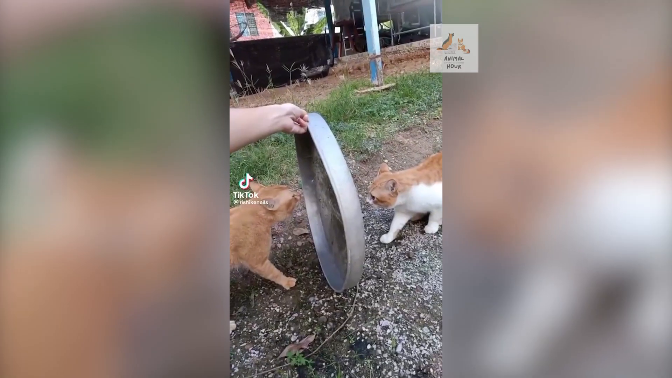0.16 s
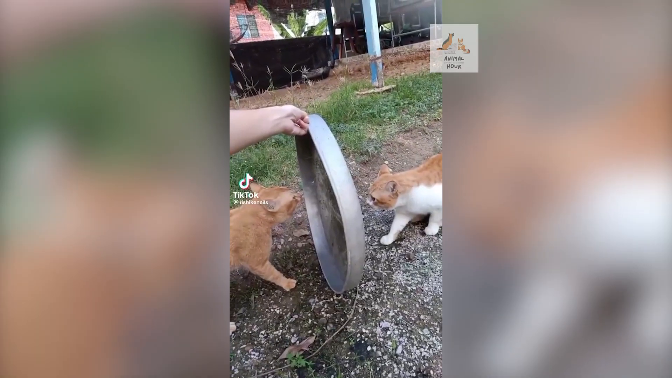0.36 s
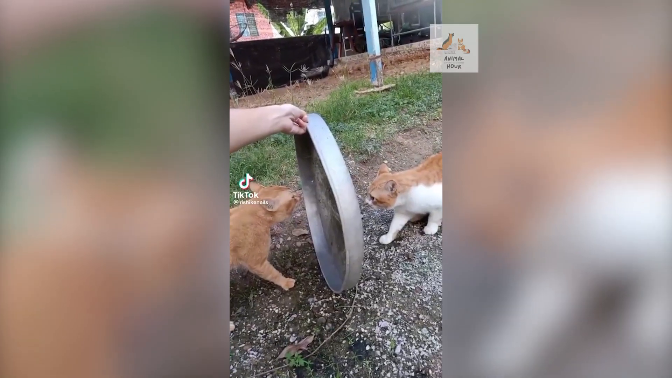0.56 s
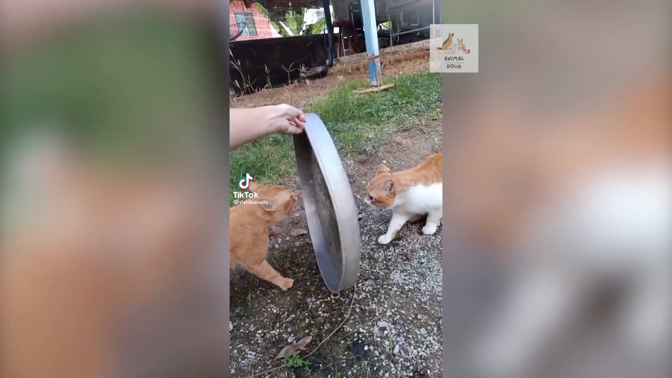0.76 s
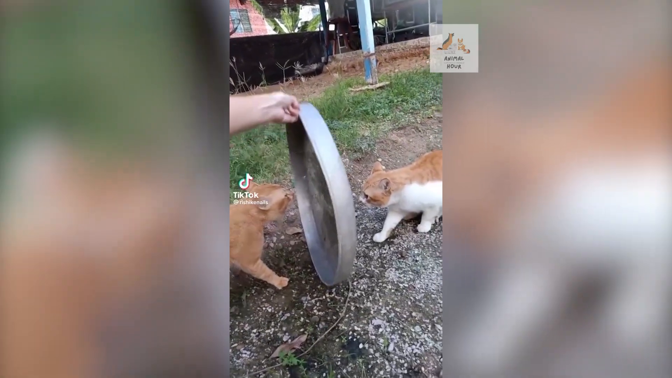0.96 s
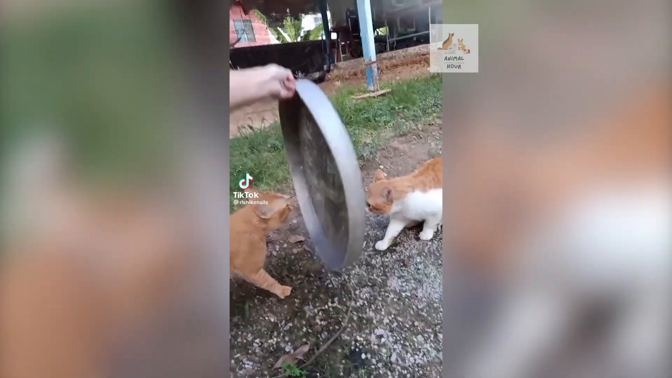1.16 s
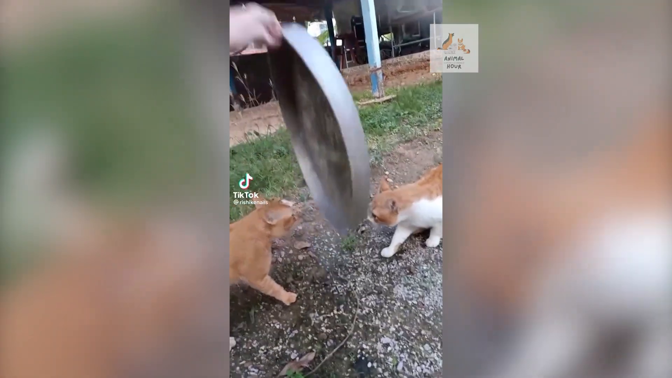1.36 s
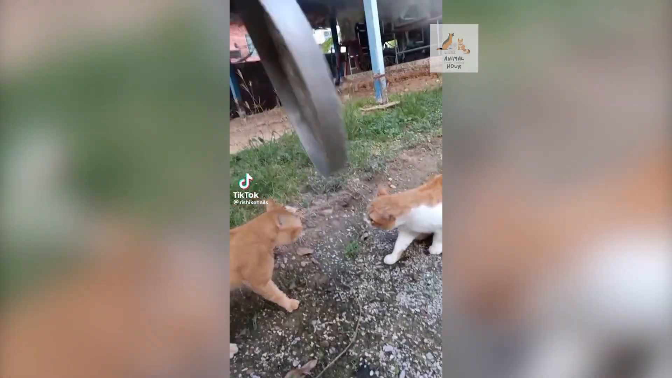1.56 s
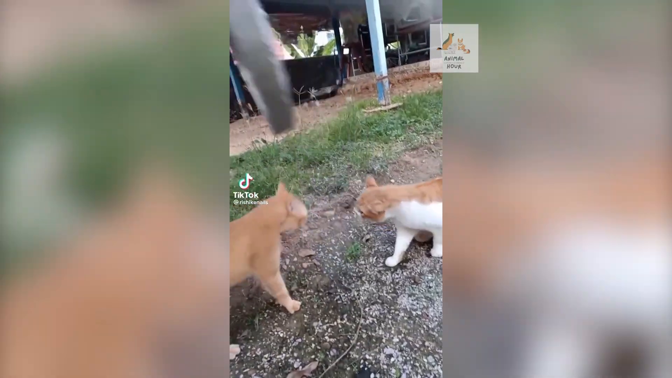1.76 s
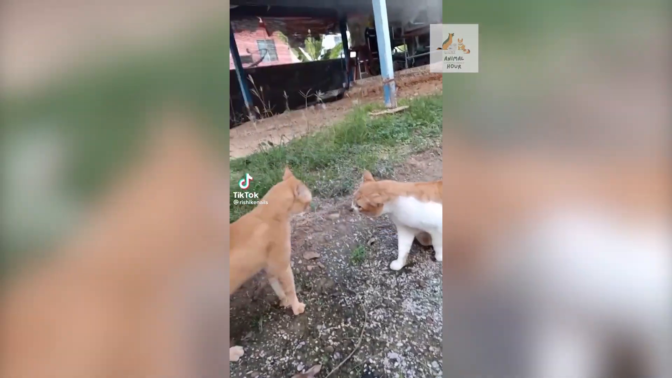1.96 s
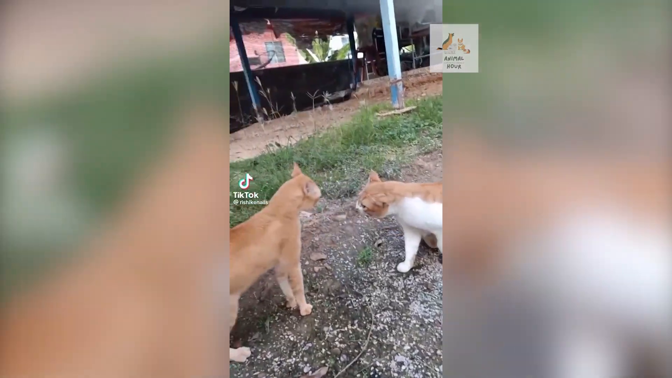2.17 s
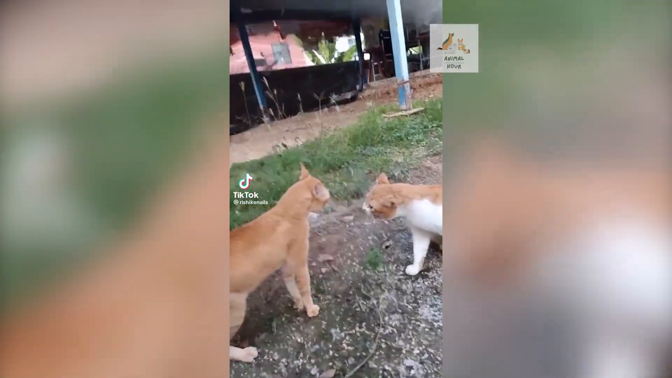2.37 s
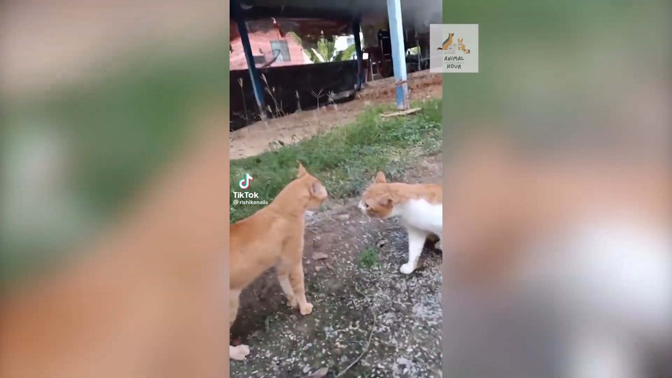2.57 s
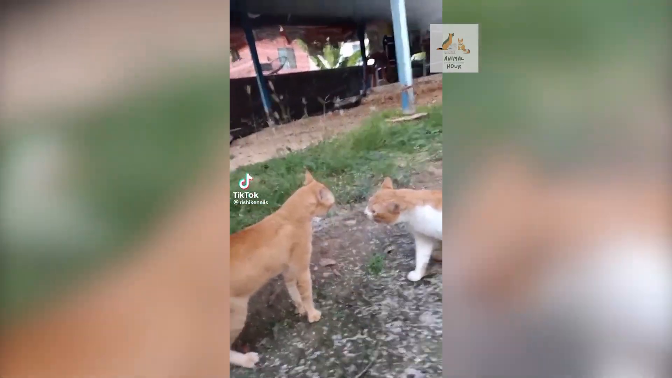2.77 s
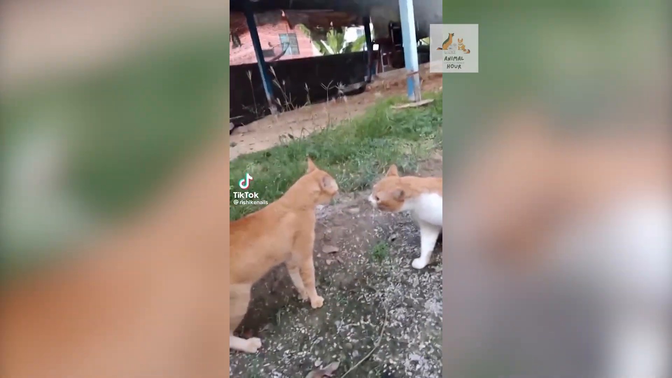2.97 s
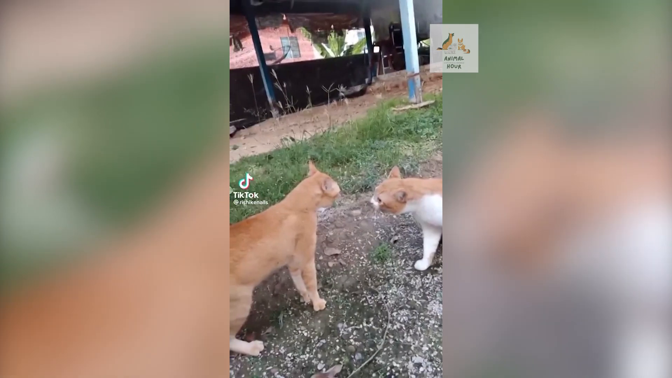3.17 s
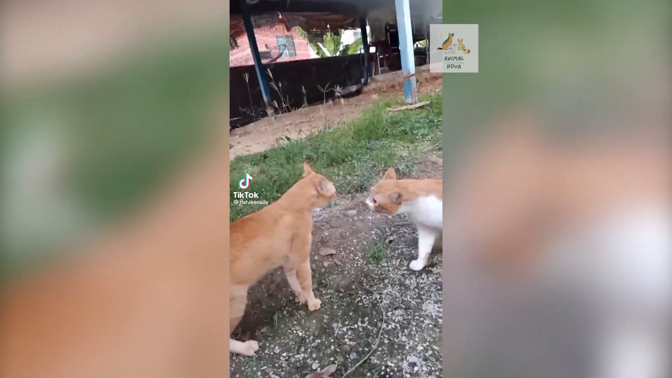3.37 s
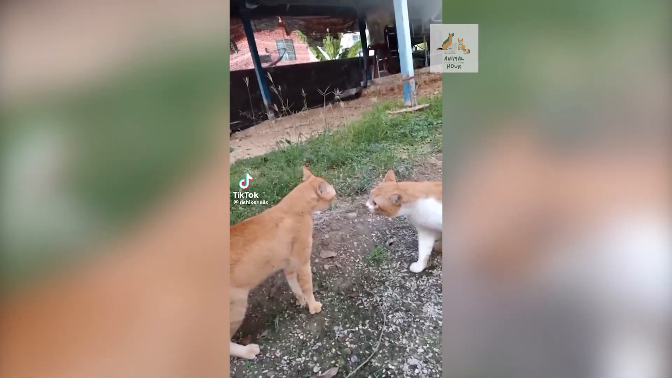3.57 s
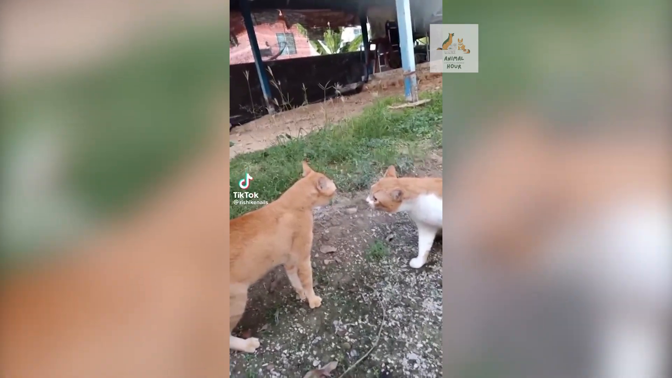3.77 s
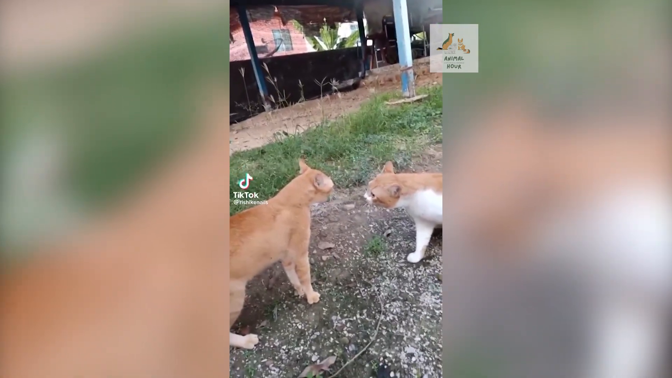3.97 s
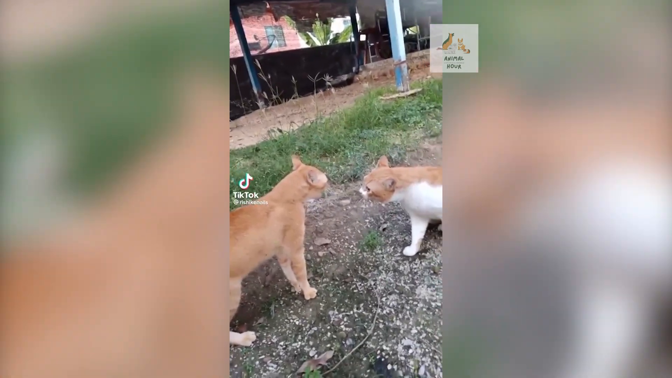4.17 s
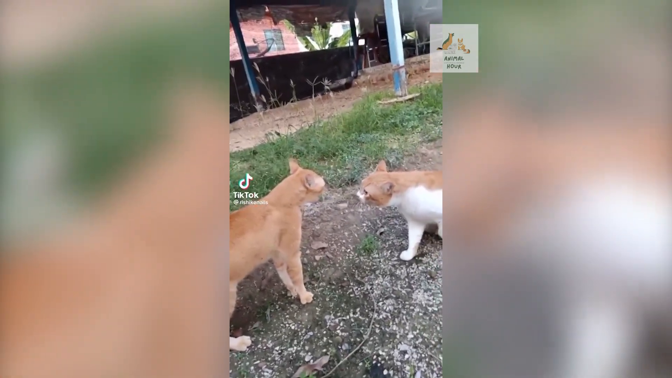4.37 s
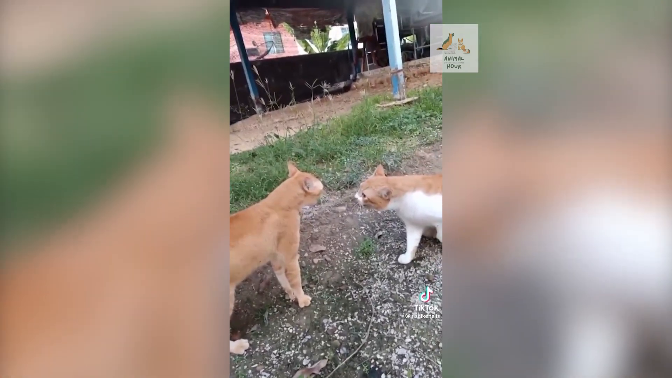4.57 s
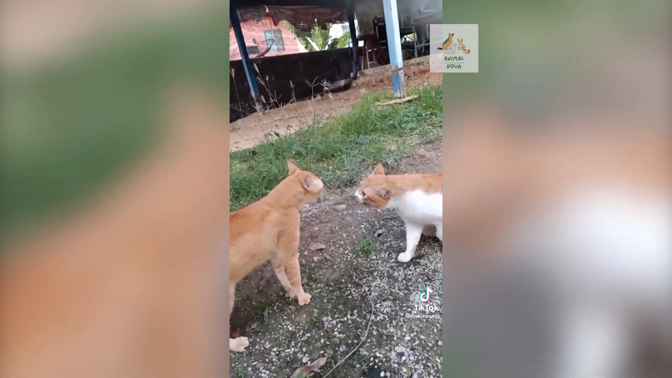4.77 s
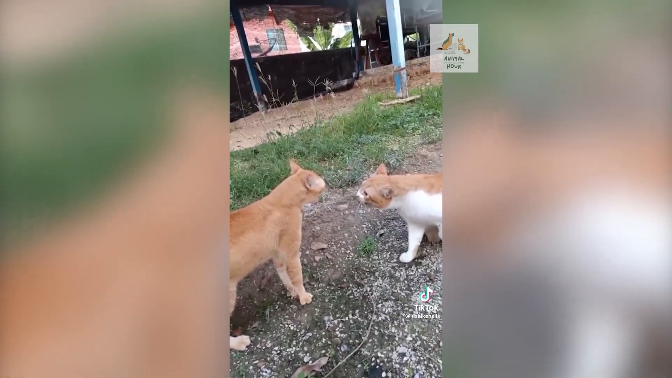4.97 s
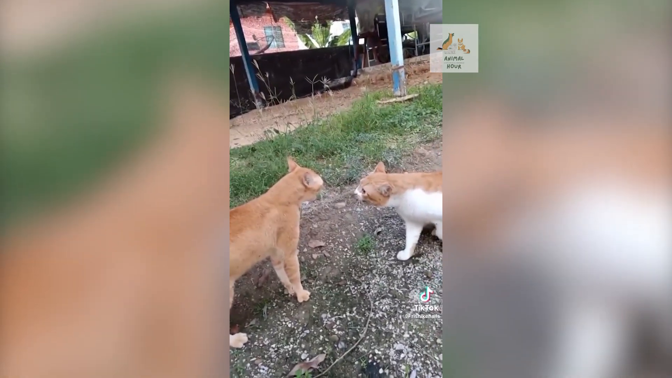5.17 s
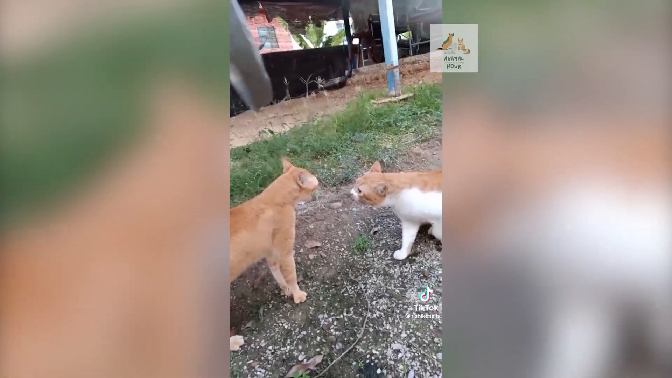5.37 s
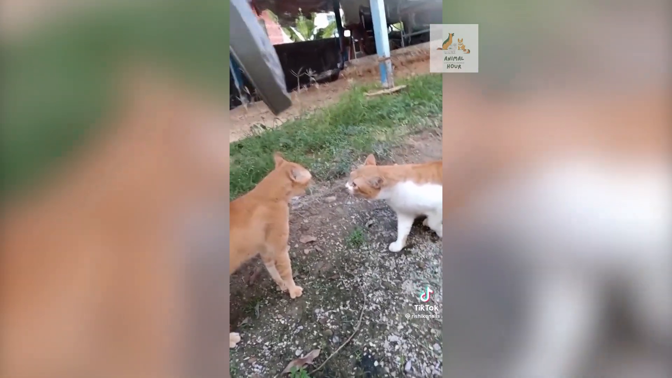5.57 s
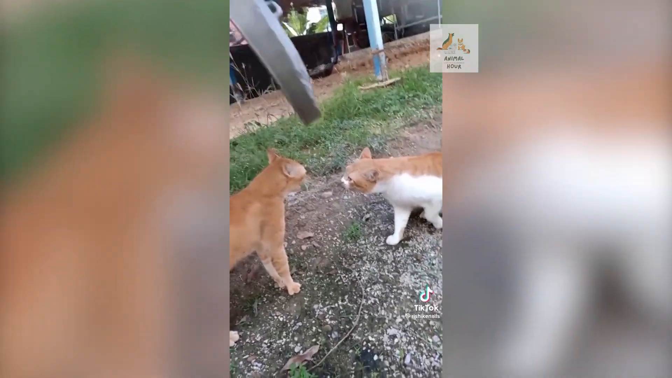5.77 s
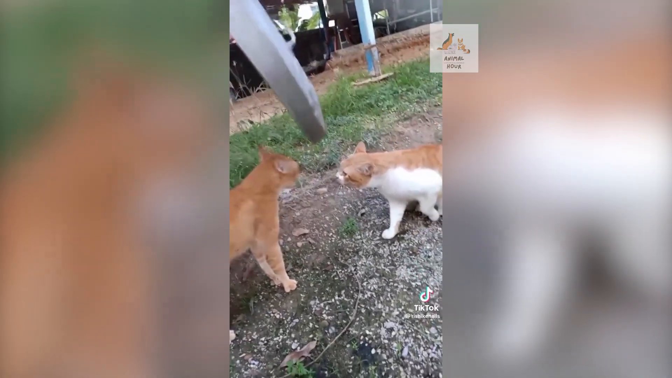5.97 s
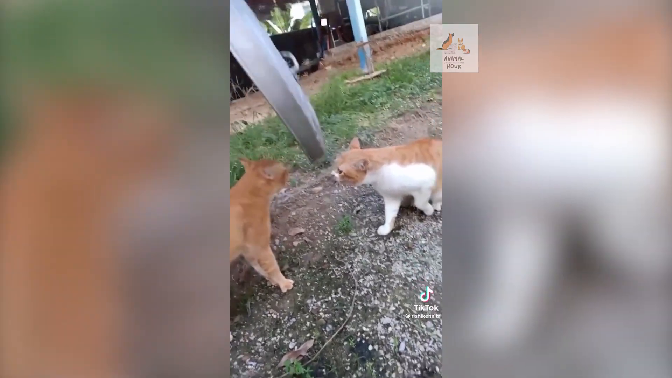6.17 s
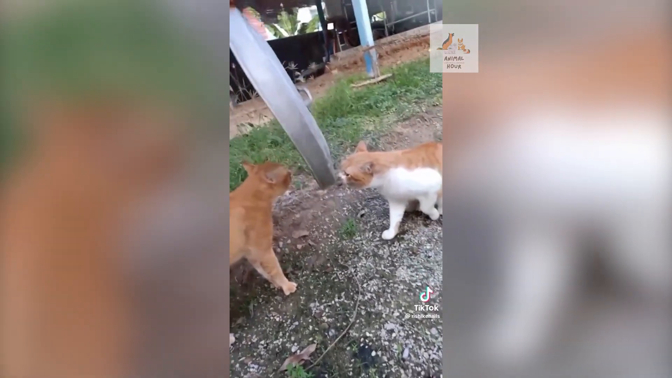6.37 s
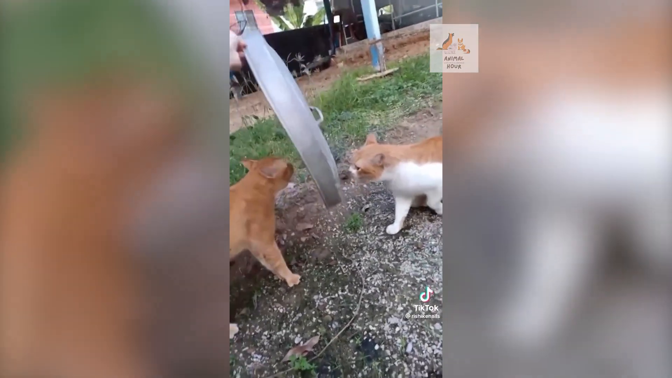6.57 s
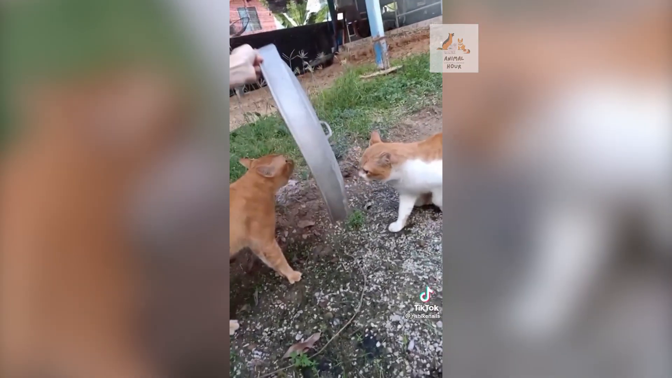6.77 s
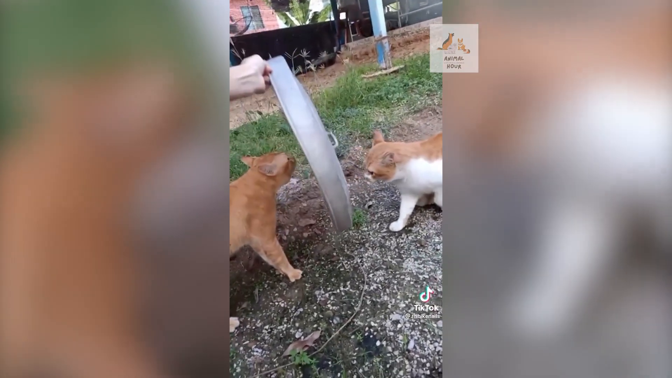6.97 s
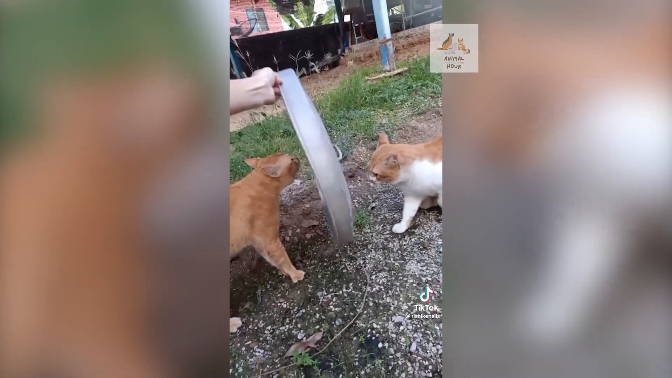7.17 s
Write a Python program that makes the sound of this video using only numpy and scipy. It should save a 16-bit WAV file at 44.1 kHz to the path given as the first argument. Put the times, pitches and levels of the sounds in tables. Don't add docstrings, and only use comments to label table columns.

```python
import sys
import numpy as np
from scipy import signal
from scipy.io import wavfile
from scipy.ndimage import uniform_filter1d

SR = 44100
rng = np.random.default_rng(int(sys.argv[2]) if len(sys.argv) > 2 else 0)


def invert_db(level):
    return 10 ** (np.asarray(level, dtype=float) / 20)


def inscribe(sig):
    pcm = np.round(np.clip(np.atleast_2d(sig).T, -1, 1) * 32767)
    wavfile.write(sys.argv[1], SR, pcm.astype(np.int16))


N = 318843
STEP = 64


def rms_one(x):
    return x / np.sqrt(np.mean(x ** 2, axis=-1, keepdims=True) + 1e-20)


def columns(rows, t):
    s, *values = np.transpose(rows)
    return [np.interp(t, s, v) for v in values]


def band(x, low_hz, high_hz, rate=SR):
    sos = signal.butter(2, [low_hz, high_hz], "band", fs=rate, output="sos")
    return rms_one(signal.sosfilt(sos, x))


def high_pass(x, order, hz):
    return signal.sosfilt(signal.butter(order, hz, "high", fs=SR, output="sos"), x)


def resonance(f, hz, width):
    return (f * width) ** 2 / ((hz ** 2 - f ** 2) ** 2 + (f * width) ** 2)


def shape(phrases, throat, side, rest_hz, lift):
    start, end = phrases[0][0], phrases[-1][0]
    t = np.append(np.arange(start, end, .005), end)
    hz, db, mouth_hz, tongue_db = columns(phrases, t)
    chest_db, throat_hz, throat_db = columns(throat, t)
    gap_hz, depth, palate_hz, palate_db = columns(side, t)
    palate_db = palate_db - np.clip(abs(np.gradient(palate_hz, t)) / 900 - 16, 0, 35)
    slack, slack_s = 0.17, 0.17
    tense = 1 - slack * np.exp(-np.minimum(t - t[0], t[-1] - t) / slack_s)
    knee = 0.67
    tongue_hz = rest_hz * tense + lift * np.maximum(0, mouth_hz - knee * rest_hz)
    mouth = np.c_[t, chest_db, gap_hz, np.clip(depth, 0, .97), mouth_hz, db, tongue_hz, db + tongue_db,
                  throat_hz, db + throat_db, palate_hz, db + palate_db]
    return np.c_[t, hz], mouth


def swallowed(f, gap_hz, depth, mouth_hz, tongue_hz, nose):
    valley = np.clip((tongue_hz - mouth_hz - 800) / 900, 0, .45)
    left = 1 - depth * resonance(f, gap_hz, 1300)
    left = left * (1 - valley * resonance(f, np.sqrt(mouth_hz * tongue_hz), 590))
    left = left * (1 - nose * resonance(f, 745, 180.0))
    left = left * (1 - 0.5 * resonance(f, 6700, 880))
    return left * (1 - 1.2 * resonance(f, 9000, 1100))


def unsteady(f, k, mouth_hz, flap, flutter, breath, shimmer_db):
    slowly, hiss = rng.standard_normal((2, len(f)))
    depth_db = shimmer_db * min(k, 12) + 2.8 * np.clip(f / 5500 - 1, 0, 1)
    wobble = invert_db(depth_db * band(slowly, 1.2, 10.0, rate=SR / STEP))
    wobble = wobble * invert_db(2.5 * np.minimum(f / 5000, 1.5) * band(hiss, 14, 55, rate=SR / STEP))
    wobble = wobble + (breath + 1.1 * flutter) * np.minimum(f / 3500, 1.4) ** 2 * hiss
    wobble = wobble * (1 + .75 * flap * resonance(f, mouth_hz, 900))
    return wobble * (1 + .4 * np.roll(flap, k))


def call(pitch, mouth, widths, chest_slope, beat, flutter, jitter, shimmer_db, breath, leak_db, nose):
    at = np.arange(round(pitch[0][0] * SR), min(N, round(pitch[-1][0] * SR)))
    t = at / SR
    beat, flutter = beat[at], flutter[at]
    hz = uniform_filter1d(columns(pitch, t)[0], size=600)
    hz = hz * (1 + jitter * band(rng.standard_normal(len(t)), 1.4, 60))
    phase = 2 * np.pi * np.cumsum(hz) / SR

    fast, slow = rng.standard_normal((2, len(t)))
    turn = 2 * np.pi * np.cumsum(245 + 40 * band(fast, 10, 80)) / SR
    flap = (np.cos(turn) + .65 * np.cos(turn / 2) + .45 * band(slow, 60, 450)) * flutter
    swell = 1 + 2 * beat * np.cos(phase / 3)
    slip = .2 * beat * np.sin(phase / 3)
    phase = phase + .14 * np.roll(flap, 44) + .05 * flutter * band(fast, 60, 300) + slip

    coarse = t[::STEP]
    coarse_hz = hz[::STEP]
    (chest_db, gap_hz, depth, mouth_hz, mouth_db, tongue_hz, tongue_db,
     throat_hz, throat_db, palate_hz, palate_db) = columns(mouth, coarse)
    resonances = [(mouth_hz, mouth_db), (tongue_hz, tongue_db), (throat_hz, throat_db),
                  (palate_hz, palate_db)]
    glide = uniform_filter1d(abs(np.gradient(np.log(coarse_hz), coarse)), size=30)
    breath = breath + 0.02 * np.minimum(glide, 3)

    out = np.zeros(len(t))
    for k in range(1, int(9000 / hz.min())):
        f = k * coarse_hz
        chest = invert_db(chest_db) / k ** chest_slope
        leak = invert_db(mouth_db + leak_db)
        power = chest ** 2 + leak ** 2
        for (centre, db), width in zip(resonances, widths):
            power = power + (invert_db(db) * resonance(f, centre, width)) ** 2
        power = power * swallowed(f, gap_hz, depth, mouth_hz, tongue_hz, nose) ** 2
        wobble = unsteady(f, k, mouth_hz, flap[::STEP], flutter[::STEP], breath, shimmer_db)
        dull = 1 / (1 + (f / 6800) ** 3.5)
        size = np.sqrt(power) * wobble * dull * (f < 15000)
        out += np.interp(t, coarse, size) * np.cos(k * phase + k * k * .4)

    torn_air = band(band(slow, 3300, 6400), 3300, 6400)
    out = out + invert_db(-17) * flutter * uniform_filter1d(abs(out), size=90) * torn_air
    fade = np.clip(np.minimum(t - t[0], t[-1] - t) / .012, 0, 1)
    full = np.zeros(N)
    full[at] = out * swell * fade
    return full


# ([Hz], [Hz], [Hz], [Hz])
RESONANCE_WIDTHS = [
    [398, 455, 760, 360],
    [230, 180, 220, 500],
]
# (time [s], pitch [Hz], level [dB], mouth resonance [Hz], tongue against mouth [dB])
FAR_HUM = [(0, 196, -52, 394, -29), (.17, 201, -49, 406, -32), (0.361, 195, -50.5, 404, -24),
           (.61, 183.8, -54.5, 366, -40), (.7, 177, -58, 346, -24), (.76, 158.6, -70, 351, -24)]
FAR_MEW = [(.71, 204.6, -50, 535, -36), (0.752, 207.6, -54, 352, -9), (0.801, 249, -58.5, 480, -2),
           (0.829, 284.4, -52.5, 470, -4.5), (0.94, 326, -47.5, 720, -10), (1.07, 339.4, -46, 793, -9),
           (1.238, 324.4, -49.5, 723, -15), (1.429, 298.8, -50, 548, -44), (1.558, 257, -49, 466, -36),
           (1.591, 243.4, -50, 567, -35)]
FAR_ANSWER = [(1.699, 254, -58, 519, -30.5), (1.788, 297, -59.5, 1220, -32), (1.889, 394, -45, 1315, -37.5),
              (2.081, 465.5, -36.5, 1396, -54), (2.17, 553.5, -22, 1430, -54), (2.3, 599.5, -21, 1566, -44),
              (2.375, 600.7, -21, 1574, -44.5), (2.466, 556.4, -23.5, 1339, -32.5),
              (2.498, 445.5, -27, 1419, -18), (2.529, 421.8, -34.5, 1324, -42)]
FAR_SINK = [(2.699, 359, -47.5, 1116, -16), (2.78, 338.6, -43.5, 870, -30), (2.849, 295, -55.5, 880, 2.5),
            (2.909, 287.5, -60, 910, -21), (2.962, 260.8, -59, 940, -20), (3.111, 231.6, -54.5, 970, -14.5),
            (3.161, 190, -73, 900, -25)]
FAR_CRY = [(4.084, 202, -65, 300, -16), (4.125, 225.3, -64, 557, -16), (4.186, 315.3, -54.5, 817, -5.5),
           (4.265, 366, -45, 1190, -16), (4.345, 378.7, -36.5, 1240, -7), (4.644, 370.3, -40, 1173, -10.5),
           (4.776, 383.7, -34, 1183, -11), (4.875, 366.4, -30, 1217, -23),
           (4.974, 328.5, -40.5, 1068, -10.5)]
FAR_GROAN = [(5.052, 316, -42.5, 1006, -21.5), (5.137, 303, -44.5, 870, -33.5), (5.207, 265, -50, 740, -23),
             (5.39, 222, -64.5, 398, -7.5), (5.485, 212.1, -55.5, 406, -20.5),
             (5.696, 215.6, -56, 384.8, -26), (5.936, 214, -56.5, 364, -5), (6.166, 201, -53.5, 360, -5),
             (6.218, 181, -72, 364, -22)]
# (time [s], chest level [dB], throat resonance [Hz], throat against mouth [dB])
FAR_POSTURE = [(0, -53.5, 5600, -32.5), (.74, -54.5, 5500, -29.5), (.765, -67, 3900, -26),
               (.86, -62, 3960, -21), (.92, -59, 4080, -15.5), (1.3, -57, 3780, -24.5),
               (1.55, -61.5, 3739, -39.5), (2.4, -63, 3693, -58), (3.16, -68.5, 3837, -36.5),
               (4.09, -72, 4310, -28.5), (4.2, -65.5, 4300, -19.5), (4.3, -62, 4700, -32),
               (4.55, -61, 4500, -33.5), (5.4, -61.5, 6800, -34.5), (6.22, -64.5, 6800, -37)]
# (time [s], swallowed band [Hz], depth [0-1], palate resonance [Hz], palate against mouth [dB])
FAR_CAVITIES = [(0, 1140, 0.91, 2110, -28), (.7, 1150, 0.35, 2010, -26), (.85, 2000, 0.19, 2430, -31),
                (1.1, 2000, 0.17, 2600, -34), (1.55, 2000, .4, 2207, -25), (2.2, 3400, 0.41, 2322, -2.5),
                (2.35, 3400, .4, 2540, -2), (2.5, 3400, 0.36, 2330, -19.5), (4.09, 3202, .4, 5700, -37.5),
                (4.23, 3200, 0.33, 5580, -22), (4.29, 3280, 0.37, 6170, -25), (4.33, 3280, 0.28, 6960, -34),
                (4.6, 3310, 0.49, 7060, -38), (5.4, 2010, 0.27, 7100, -46), (6.22, 2006, 0.65, 7030, -43.5)]
# (time [s], level [dB])
NOSE_AIR = [(0, -88), (.7, -80), (1.05, -72.5), (1.5, -83), (1.6, -71), (2.6, -85.5), (4.0, -90),
            (7.23, -100)]


def far_cat():
    breaths = [FAR_HUM, FAR_MEW + FAR_ANSWER + FAR_SINK, FAR_CRY + FAR_GROAN]
    tongue_rest_hz = [2120, 1320, 1900]
    tongue_lift = [1.6, 0.79, 1.5]
    no_beat, calm = np.zeros(N), np.full(N, .015)
    moans = 0
    for phrases, rest_hz, lift in zip(breaths, tongue_rest_hz, tongue_lift):
        pitch, mouth = shape(phrases, FAR_POSTURE, FAR_CAVITIES, rest_hz, lift)
        moans = moans + call(pitch, mouth, RESONANCE_WIDTHS[1], 3.0, no_beat, calm, jitter=0.0054,
                             shimmer_db=0.205, breath=0.08, leak_db=-52, nose=0.1)
    low, high = rng.standard_normal((2, N))
    hiss = band(low, 1500, 3000) + .45 * band(high, 3800, 6300)
    return moans + invert_db(columns(NOSE_AIR, np.arange(N) / SR)[0]) * hiss


# (delay [s], level [dB])
CLOSE_ECHOES = [
    (.0011, -9),
    (.0027, -11),
]


def mirrored(x):
    top = high_pass(x, 2, 3000)
    return x + sum(invert_db(db) * np.roll(top, round(s * SR)) for s, db in CLOSE_ECHOES)


def yard(x):
    t60_s, level_db = 0.31, -20
    t = np.arange(SR // 2) / SR
    white = rng.standard_normal(len(t))
    tail = band(white, 360, 4500) + 1.1 * band(white, 4200, 6600)
    tail = tail * invert_db(-60 * t / t60_s) * (t > .012)
    return invert_db(level_db) * signal.fftconvolve(x, tail / np.sqrt(np.sum(tail ** 2)))[:N]


# (frequency [Hz], density [dB per Hz])
AIR_COLOUR = [(25, -24.5), (110, -7), (280, -13), (420, -11.5), (700, -18), (1200, -19), (2500, -41.5),
              (5000, -41), (15000, -57)]
# (time [s], level [dB])
AIR_GAIN = [(0, -73), (1.7, -63.5), (2.5, -76.5), (4.0, -74.5), (5.0, -72), (7.23, -69)]


def air():
    edges = 25 * 2 ** np.arange(0, 9.6, .5)
    white = rng.standard_normal((2, N))
    hz, db = np.transpose(AIR_COLOUR)
    out = 0
    for k, (low, high) in enumerate(zip(edges, edges[1:])):
        slow = band(rng.standard_normal(N // STEP + 1), 0.79, 5.9, rate=SR / STEP)
        level_db = np.interp(np.log(low * high) / 2, np.log(hz), db)
        level_db = level_db + 2.0 * np.repeat(slow, STEP)[:N]
        out = out + invert_db(level_db) * np.sqrt(high - low) * band(white[k % 2], low, high)
    return invert_db(columns(AIR_GAIN, np.arange(N) / SR)[0]) * rms_one(out)


# (time [s], peak level [dB],
# centre [Hz], half width [ratio])
DRY_TICKS = [(.106, -62, 5500, 1.1), (.108, -64, 4000, 1.1), (0.541, -61, 1500, 1.7),
             (1.951, -29, 8610, 2.3), (1.952, -40, 603, 2.16), (2.507, -41.5, 9905, 1.41),
             (3.07, -42, 2206, 1.32), (3.621, -51, 2814, 1.5), (4.197, -50.5, 4786, 1.06),
             (4.199, -61, 5930, 1.06), (4.2, -53.5, 3200, 1.44), (5.27, -38, 2260, 1.5),
             (6.248, -38, 2300, 1.95), (6.25, -39.5, 300.4, 2.7), (6.362, -53, 9770, 1.4)]


def ticks():
    out = np.zeros(N)
    impulse = np.eye(1, 400)[0]
    for s, db, hz, ratio in DRY_TICKS:
        sos = signal.butter(3, [hz / ratio, hz * ratio], "band", fs=SR, output="sos")
        click = signal.sosfilt(sos, impulse)
        i = round(s * SR)
        out[i:i + 400] += invert_db(db) * click / click.max()
    return out


# (time [s], length [s], centre [Hz], level [dB])
YARD_RUSTLES = [(2.841, 0.18, 610, -74.5), (3.079, 0.15, 1070, -61.5), (3.432, 0.18, 940, -68),
                (4.74, 0.16, 585, -67), (5.188, .2, 1083, -59), (5.24, 0.22, 615, -67),
                (5.72, 0.24, 649.5, -63), (6.785, 0.15, 607, -61.5), (0.779, 0.2, 5620, -76.5),
                (0.714, 0.052, 1330, -70), (4.0, 0.16, 2370, -71.5), (6.88, 0.066, 2250, -59)]


def rustles():
    out = np.zeros(N)
    for s, length, hz, db in YARD_RUSTLES:
        swell = np.hanning(int(np.clip(length, .02, .45) * SR)) ** .5
        noise = band(rng.standard_normal(SR // 2), hz - 110, hz + 110)[-len(swell):]
        i = round(s * SR)
        out[i:i + len(swell)] += (invert_db(db) * swell * noise)[:N - i]
    return out


# (time [s], pitch [Hz], level [dB], mouth resonance [Hz], tongue against mouth [dB])
NEAR_SCREAM_ONSET = [(1.545, 242.3, -46.5, 570, -8.5), (1.58, 317, -40, 836, -3.5),
                     (1.615, 382, -37, 1180, -7.5), (1.635, 434.5, -45.5, 1409, 8),
                     (1.66, 491, -29.5, 2344, -15), (1.7, 529, -21, 2494, -35.5)]
NEAR_SCREAM_RISE = [(1.756, 574, -10.5, 2585, -42.5), (1.815, 660, -12, 2544, -17),
                    (1.849, 700, -14.5, 2513, -2), (1.894, 736, -7, 2462, -23.5),
                    (1.936, 793, -12.5, 2372, -6.5), (1.97, 804, -11, 2310, -1),
                    (2.008, 830, -11.5, 2423, -1.5), (2.044, 836.4, -13, 2426, 2.5),
                    (2.085, 840.7, -13, 2401, 1.5)]
NEAR_SCREAM_FALL = [(2.143, 842, -16.5, 2477, 3.5), (2.202, 821.3, -13.5, 2355, 1.5),
                    (2.255, 815, -13.5, 2328, -2.5), (2.319, 786, -14, 2222, -9),
                    (2.386, 777.7, -13, 2274, -23), (2.43, 741.7, -16, 2130, -36),
                    (2.484, 717.3, -18.5, 1934, -14.5)]
NEAR_SCREAM_END = [(2.584, 703, -22.5, 1926, -9), (2.625, 658, -28, 1729, -0.5),
                   (2.684, 655, -23.5, 1750, -7.5), (2.709, 622, -27, 1845, -1.5),
                   (2.745, 609, -23.5, 2036, -5.5), (2.773, 535, -21.5, 2040, -28)]
NEAR_MOAN = [(2.766, 515.6, -31.5, 1900, 4.5), (2.817, 501, -34, 1873, -5), (2.9, 506, -32, 1860, -6.5),
             (2.96, 504.5, -34.5, 1806, 0.5), (3.03, 492, -32.5, 1810, -2.5),
             (3.137, 465.4, -25.5, 1810, -14), (3.29, 452.2, -25.5, 1777, -17),
             (3.351, 437, -26, 1740, -18.5)]
NEAR_SAG = [(3.448, 413, -30, 1490, -28), (3.53, 395, -33.5, 1400, -17.5), (3.637, 382.3, -34, 1320, -9),
            (3.749, 362.7, -31, 1414, -11), (3.858, 358.5, -32, 1375, -6.5),
            (3.94, 345.8, -32.5, 1360, -5.5), (3.985, 338.2, -34, 1290, -8),
            (4.02, 296, -43.5, 1131, -11.5)]
NEAR_YOWL = [(4.519, 264.2, -54, 1109, -17), (4.558, 318.3, -41, 1271, -23), (4.601, 377, -35.5, 1393, -8),
             (4.635, 419, -34, 1530, 0.5), (4.689, 435.8, -25, 2035, -7), (4.755, 459.5, -20, 2147, -13.5),
             (4.839, 477.8, -22.5, 2265, -10), (4.922, 485.5, -24, 2356, -6.5),
             (5.019, 486, -21.5, 2340, -10.5)]
NEAR_HOLD = [(5.12, 470.7, -20.5, 2135, -14.5), (5.169, 459.6, -21.5, 1900, -8),
             (5.3, 455.4, -21, 1831, -12), (5.401, 453, -22.5, 1712, -8), (5.485, 445.7, -21, 1750, -21),
             (5.579, 427.3, -22.5, 1630, -17)]
NEAR_MUMBLE = [(5.62, 415.5, -25.5, 1470, -27), (5.656, 412.6, -27, 1347, -35),
               (5.69, 392.2, -23, 1180, -13), (5.725, 398, -20.5, 1190, -19),
               (5.752, 373, -28.5, 1130, -12.5), (5.791, 347, -41.5, 1090, -9),
               (5.812, 349, -38, 1060, -9.5), (5.961, 339, -36, 1061, -9.5),
               (6.048, 314.6, -46, 1040, -0.5), (6.129, 305.6, -39, 1105, -7.5),
               (6.27, 302.8, -39, 1110, -2)]
NEAR_WAIL = [(6.3, 310.8, -36.5, 1197, -8), (6.335, 331.7, -34, 1270, -2.5),
             (6.391, 367.2, -25.5, 1450, -7.5), (6.43, 380, -23.5, 1530, -11),
             (6.465, 410.5, -24, 1590, -27.5), (6.503, 429.5, -20.5, 1743, -15),
             (6.55, 436.4, -18, 1797, -8), (6.629, 443.8, -16.5, 1873, -14)]
NEAR_FADE = [(6.698, 431, -20, 1700, -11.5), (6.799, 387.5, -25.5, 1352, -15),
             (6.85, 359.6, -34.5, 1250, -7.5), (6.902, 310.7, -43, 1060, 2), (6.94, 288.6, -54, 965, -23.5)]
# (time [s], chest level [dB], throat resonance [Hz], throat against mouth [dB])
NEAR_POSTURE = [(1.545, -51, 5300, -11.5), (1.76, -58, 5767, -35), (1.9, -41, 5080, -22.5),
                (2.05, -78, 5130, -13), (2.3, -46.5, 5250, -36.5), (2.5, -61, 4575, -21.5),
                (2.75, -62.5, 4530, -29), (2.8, -60.5, 5350, -21.5), (3.15, -63, 4920, -34),
                (3.6, -57, 5310, -35), (3.95, -58.5, 4980, -35.5), (4.55, -64, 5580, -37),
                (4.64, -62.5, 5455, -28.5), (4.75, -64.5, 5060, -28), (4.95, -64, 4600, -21),
                (5.3, -58.5, 5500, -57), (5.65, -56, 5260, -28), (5.71, -55, 5160, -35),
                (5.75, -49, 4737, -17.5), (5.8, -51, 4510, -14.5), (5.83, -51, 5105, -23),
                (5.95, -51.5, 5060, -20), (6.12, -50.5, 4850, -21.5), (6.25, -53.5, 5100, -23),
                (6.35, -52.5, 4777, -26.5), (6.6, -51.5, 5640, -32), (6.92, -51, 5086, -24)]
# (time [s], swallowed band [Hz], depth [0-1], palate resonance [Hz], palate against mouth [dB])
NEAR_CAVITIES = [(1.545, 3630, 0.2, 7800, -42), (1.66, 3698, 1, 7800, -42), (1.78, 4270, 0, 8000, -33.5),
                 (1.88, 6800, 0, 3590, -16), (2.0, 6500, 0.05, 7200, -41.5), (2.15, 6530, 0.02, 7080, -45),
                 (2.3, 6500, 0.5, 7000, -57), (2.6, 4644, 0.23, 3610, -36), (2.78, 4983, 0.66, 3720, -20),
                 (2.95, 5080, 0.27, 3800, -5), (3.25, 4610, 0.46, 3900, -59), (3.4, 4440, 0.65, 5000, -31),
                 (3.55, 3630, 0.04, 6900, -38), (3.72, 3550, 0.94, 6910, -37.5),
                 (3.9, 3300, 0.9, 6900, -46.5), (4.02, 3490, 0.98, 6850, -43.5),
                 (4.52, 4050, 0.95, 2410, -9), (4.58, 3290, 0.5, 2550, -9.5), (4.63, 3330, 1, 2900, 5),
                 (4.72, 4370, 0.5, 3820, -28), (4.9, 4520, 0.4, 4000, -16), (5.1, 4470, 0.29, 3898, -22.5),
                 (5.3, 4443, 0.77, 3800, -17), (5.45, 4570, 0.4, 3888, -20.5),
                 (5.5, 3680, 0.57, 6500, -47.5), (5.62, 3606, 0.55, 6500, -27.5),
                 (5.66, 1740, 0.63, 6250, -29), (5.76, 1740, 0.6, 6550, -49.5), (5.8, 3650, 0.1, 4200, -22),
                 (5.95, 3520, 0, 4300, -16.5), (6.05, 3526, 0.03, 4050, -15), (6.12, 3460, 0.35, 4000, -7),
                 (6.28, 3522, 0.77, 3950, -9), (6.33, 3340, 0.4, 4550, -19), (6.43, 3500, 0.56, 5350, -40),
                 (6.46, 3300, 0.6, 3750, -31.5), (6.6, 3750, 1, 4400, -36.5), (6.72, 3696, 0.7, 4300, -28),
                 (6.78, 3630, 0.84, 6060, -32.5), (6.92, 3600, 0.64, 5900, -17)]
# (time [s], every-third-cycle beat [0-1], irregular flutter [0-1])
SCREAM_RASP = [(1.65, 0, .04), (1.86, 0, .06), (1.9, 0, .13), (1.955, 0, .12), (1.972, .08, .3),
               (1.995, .1, .3), (2.01, .19, .1), (2.07, .2, .1), (2.085, .05, .55), (2.17, .05, .5),
               (2.19, .08, .36), (2.27, .1, .33), (2.36, .05, .2), (2.46, .06, .2), (2.49, .18, .15),
               (2.6, .18, .15), (2.63, .06, .05), (2.74, .05, .03), (2.77, 0, .006)]


def near_cat():
    breaths = [NEAR_SCREAM_ONSET + NEAR_SCREAM_RISE + NEAR_SCREAM_FALL + NEAR_SCREAM_END,
               NEAR_MOAN + NEAR_SAG,
               NEAR_YOWL + NEAR_HOLD + NEAR_MUMBLE + NEAR_WAIL + NEAR_FADE]
    tongue_rest_hz = [2600, 2760, 2610]
    tongue_lift = [1.52, 1, 0.71]
    edge_flutter, edge_s = .1, .035
    t = np.arange(N) / SR
    beat, flutter = columns(SCREAM_RASP, t)
    for phrases in breaths:
        for end in (0, -1):
            flutter = flutter + edge_flutter * np.exp(-abs(t - phrases[end][0]) / edge_s)
    calls = 0
    for phrases, rest_hz, lift in zip(breaths, tongue_rest_hz, tongue_lift):
        pitch, mouth = shape(phrases, NEAR_POSTURE, NEAR_CAVITIES, rest_hz, lift)
        calls = calls + call(pitch, mouth, RESONANCE_WIDTHS[0], 1.2, beat, flutter, jitter=0.00032,
                             shimmer_db=0.1468, breath=.04, leak_db=-61.5, nose=0.46)
    return high_pass(calls, 4, 240)


def scene():
    cats = mirrored(far_cat() + near_cat())
    return (cats + yard(cats) + air() + ticks() + rustles())[None]


def low_pass(x):
    return signal.sosfilt(signal.butter(12, 15800, fs=SR, output="sos"), x)


def record(dry):
    buzz = high_pass(np.abs(dry), 6, 9000)
    x = 1.8 * np.tanh((dry + invert_db(-38.5) * buzz) / 1.354)
    x = signal.sosfilt(signal.cheby2(12, 70, 15700, fs=SR, output="sos"), x)
    return low_pass(x)


dry = scene()
out = record(dry)
inscribe(out)
```